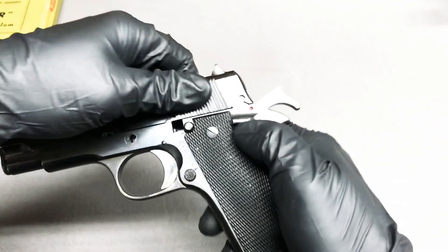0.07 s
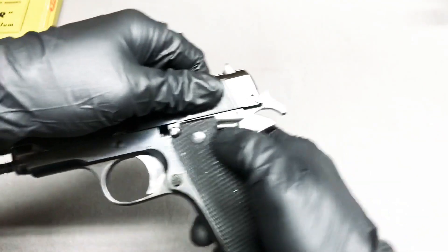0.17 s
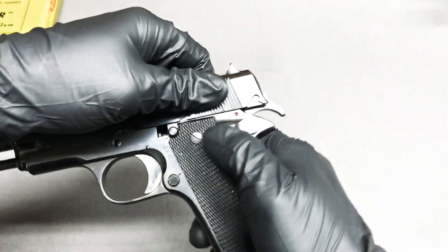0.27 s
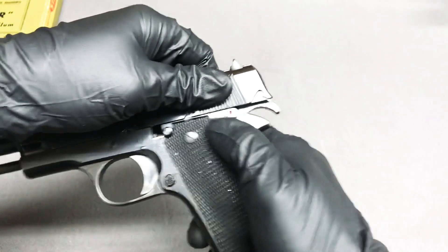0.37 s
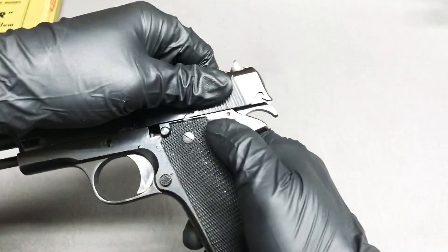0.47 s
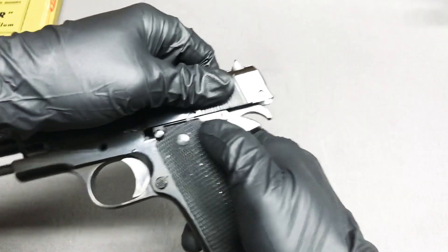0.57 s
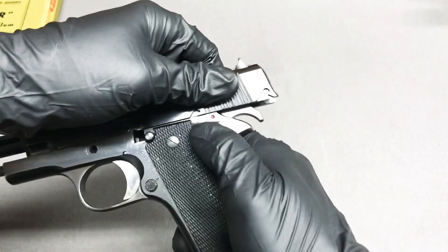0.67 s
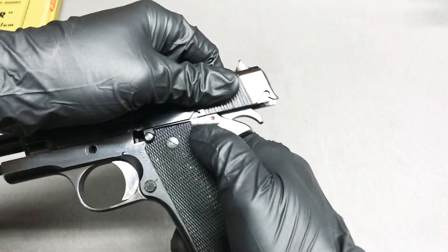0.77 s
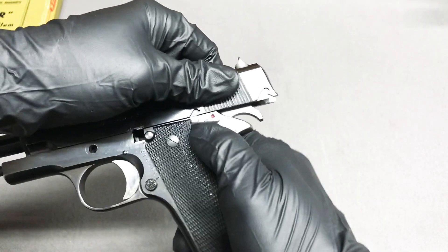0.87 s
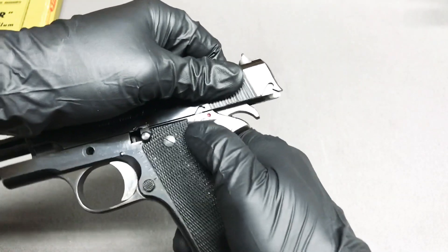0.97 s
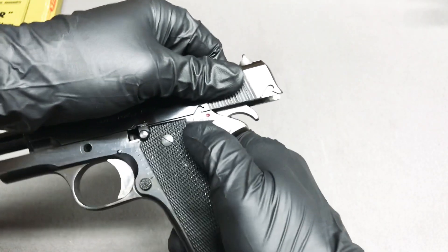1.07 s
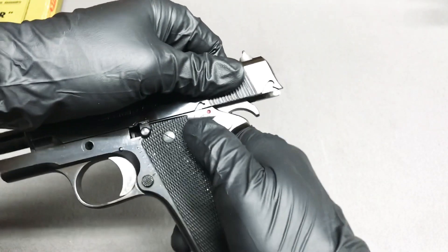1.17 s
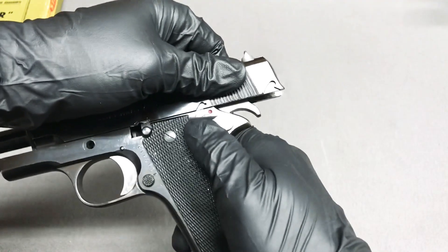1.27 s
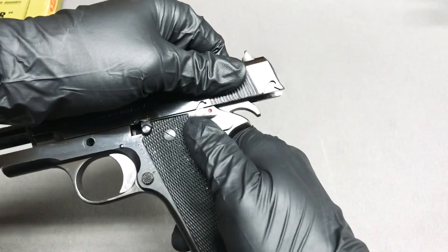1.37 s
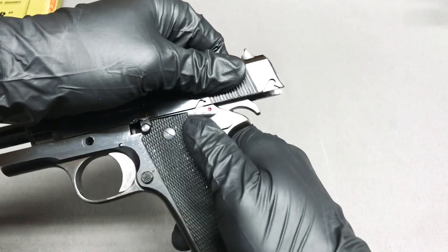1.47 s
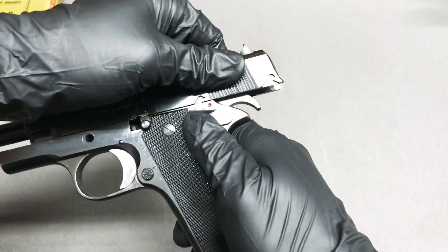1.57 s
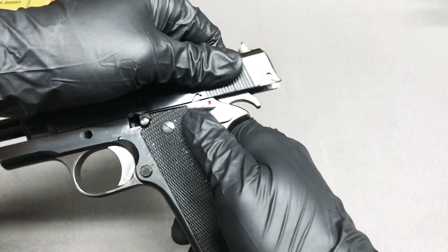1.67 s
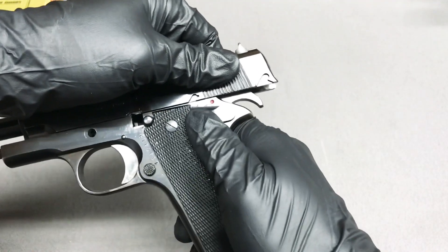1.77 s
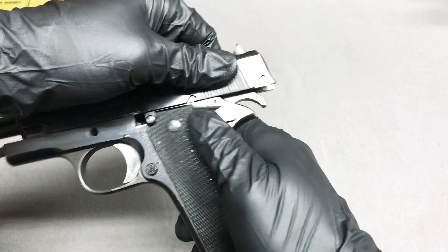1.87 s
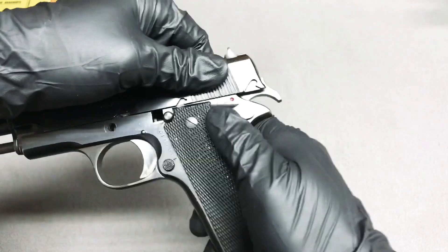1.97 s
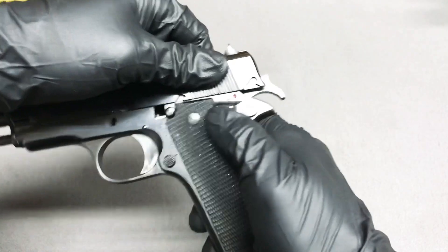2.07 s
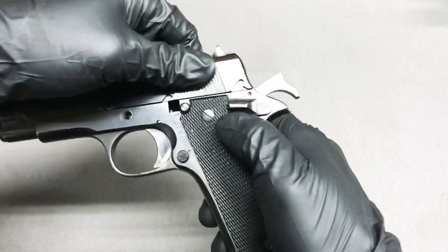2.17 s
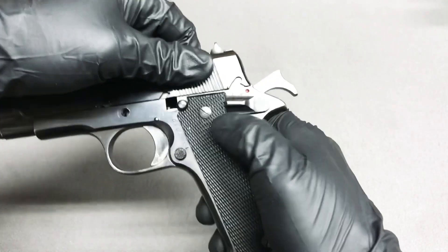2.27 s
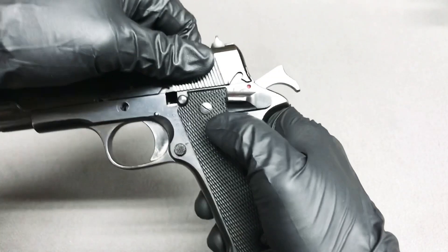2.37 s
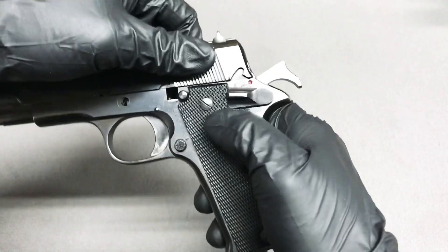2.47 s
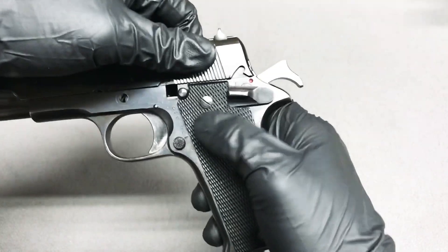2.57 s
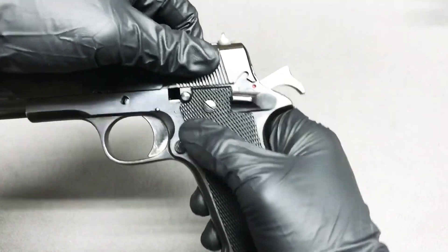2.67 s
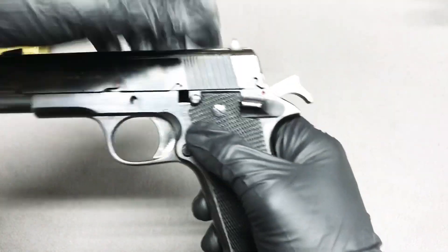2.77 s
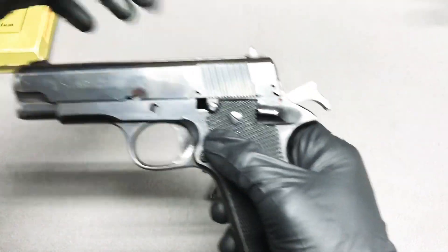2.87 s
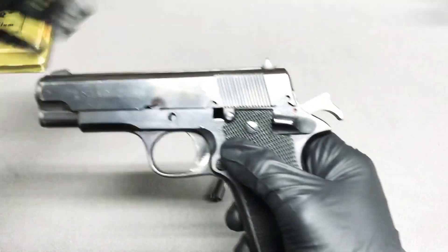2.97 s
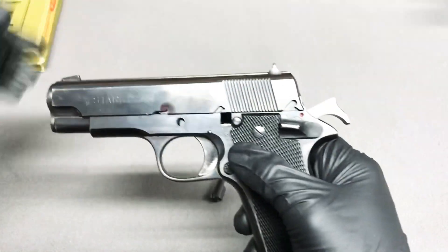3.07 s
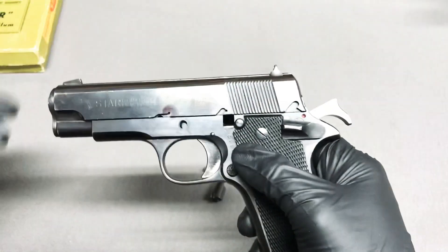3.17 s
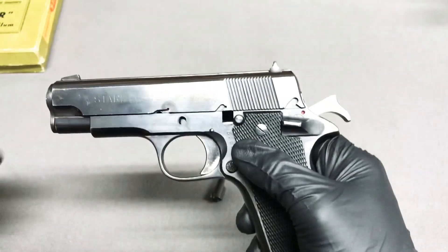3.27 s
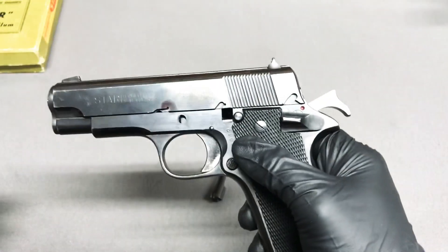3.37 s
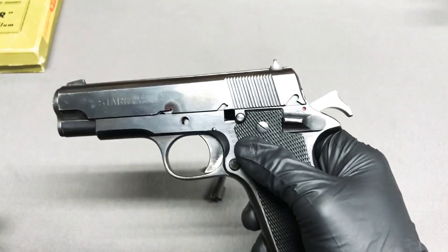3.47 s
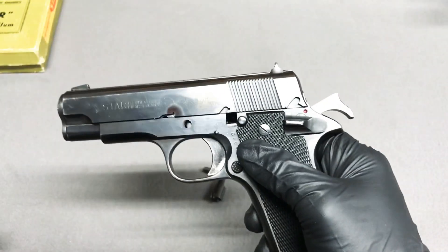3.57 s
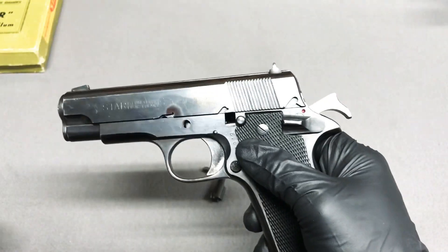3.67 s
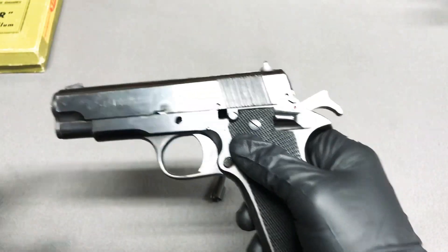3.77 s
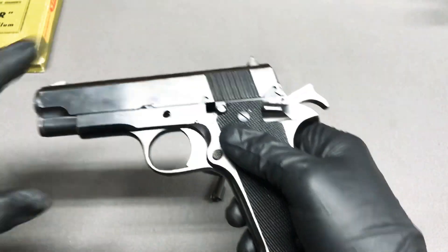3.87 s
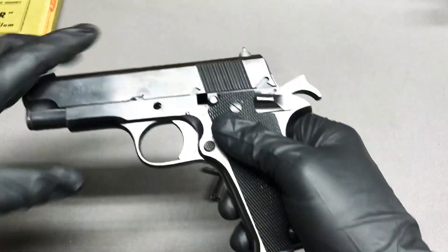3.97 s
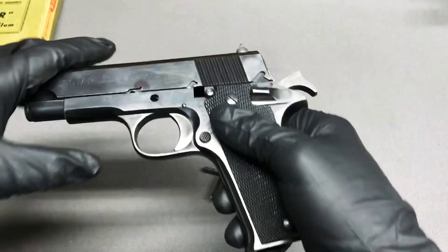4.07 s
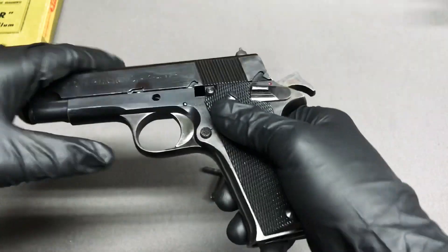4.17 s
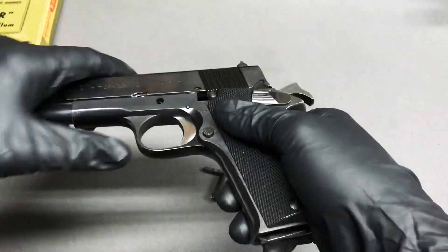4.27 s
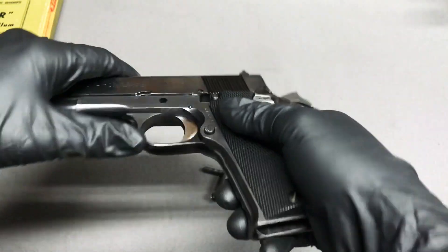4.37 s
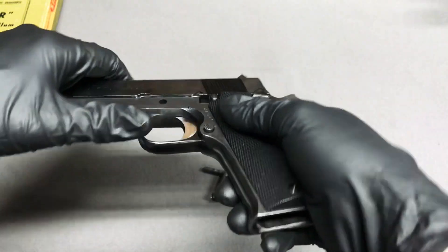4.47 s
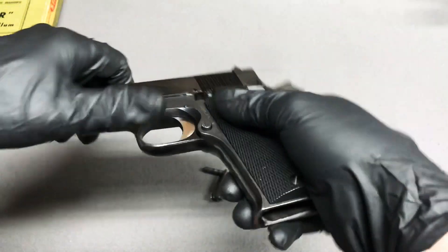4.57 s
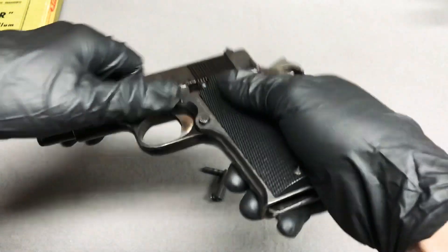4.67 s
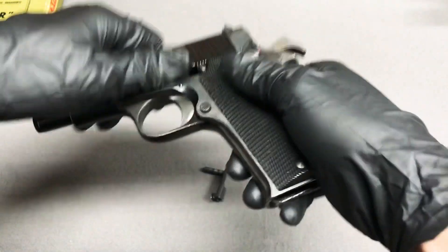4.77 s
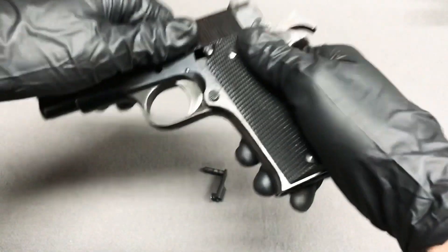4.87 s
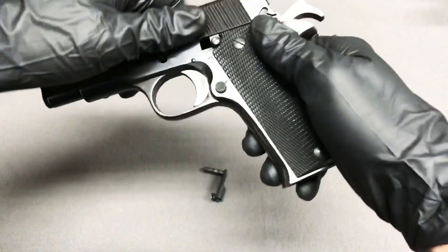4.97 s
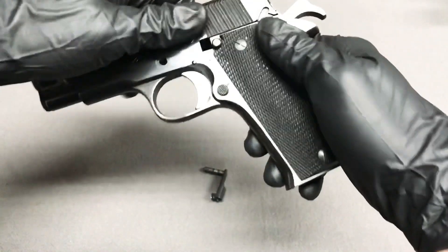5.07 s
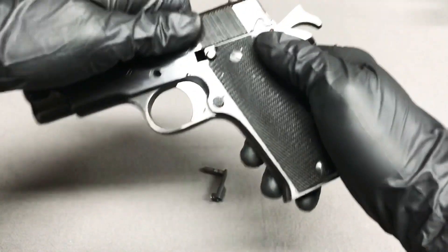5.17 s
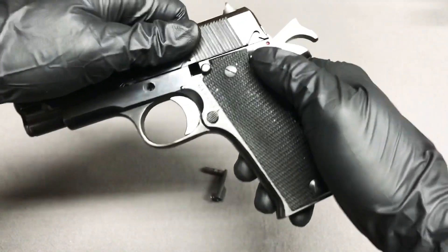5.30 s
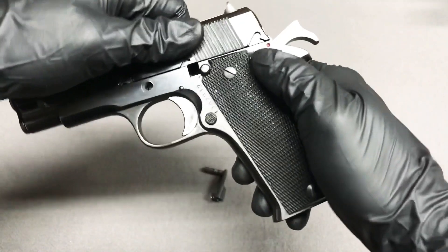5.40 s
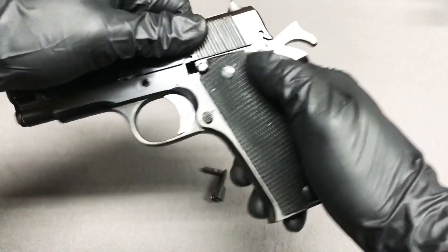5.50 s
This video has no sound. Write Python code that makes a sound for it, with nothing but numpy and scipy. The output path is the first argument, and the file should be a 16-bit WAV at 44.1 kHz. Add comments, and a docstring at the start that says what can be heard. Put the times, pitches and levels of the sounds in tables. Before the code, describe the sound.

Sharp steel clicks and a brief high ping as a pistol's slide is worked by gloved hands, close up in a quiet room.

```python
"""One hears clusters of sharp steel clicks, close by in a quiet room, as gloved hands work a pistol's slide.
Slide, frame and hammer catch on each other: short noise forces excite damped modes, and a small part pings near 7 kHz.
Between the clicks the slide rubs on its rails and the gloves rustle, made of coloured friction noise and snaps.
Underneath lie a low rumble, a steady hum and a faint hiss that rises after each loud click."""
import sys
import numpy as np
from scipy import signal
from scipy.fft import rfft, irfft
from scipy.io import wavfile
from scipy.ndimage import uniform_filter1d

SR = 44100
rng = np.random.default_rng(int(sys.argv[2]) if len(sys.argv) > 2 else 0)


def unload_wav(signal):
    """Save mono or channel-first audio to the path in sys.argv[1] as 16-bit WAV at rate SR, clipped to [-1, 1]."""
    wavfile.write(
        sys.argv[1],
        SR,
        np.round(np.clip(np.atleast_2d(signal).T, -1, 1) * 32767).astype(np.int16),
    )


N = 244065
TIME = np.arange(N) / SR


def from_db(db):
    """Logarithmic level: decibels to amplitude gain."""
    return 10 ** (np.asarray(db) / 20)


def rms_one(x):
    """Power normalisation: scale to rms 1."""
    return x / np.sqrt(np.mean(x ** 2) + 1e-20)


def attack_one(x):
    """Power normalisation of an onset: scale to rms 1 over the first 4 ms."""
    return rms_one_gain(x[:int(.004 * SR)]) * x


def rms_one_gain(x):
    """Power normalisation: the gain that brings x to rms 1."""
    return 1 / np.sqrt(np.mean(x ** 2) + 1e-20)


def band(x, low_hz, high_hz, order=2):
    """Band limitation: a causal Butterworth band-pass."""
    edges = [low_hz, min(high_hz, .45 * SR)]
    return signal.sosfilt(signal.butter(order, edges, "band", fs=SR, output="sos"), x)


def resonate(x, hz, width):
    """Damped resonance: a two-pole filter of the given width in Hz, with a gain near 1 at its peak."""
    r = np.exp(-np.pi * width / SR)
    numerator = np.array([1, 0, -1]) * (1 - r * r) / 2
    return signal.lfilter(numerator, [1, -2 * r * np.cos(2 * np.pi * hz / SR), r * r], x)


def fade(t, t60):
    """Exponential decay: the amplitude falls by 60 dB in t60 seconds."""
    return np.exp(-np.log(1000) * t / t60)


def swell(middle, length):
    """Gaussian envelope: a smooth rise and fall, at 1/e of its peak half a length from the middle."""
    return np.exp(-(2 * (TIME - middle) / length) ** 2)


def colour(x, points):
    """Spectral shaping: impose levels drawn between (Hz, dB) points, with skirts outside; rms 1."""
    hz, db = np.transpose(points)
    f = np.maximum(np.fft.rfftfreq(N, 1 / SR), 1)
    skirts = np.minimum(1, f / hz[0]) ** 4 * np.minimum(1, hz[-1] / f) ** 2
    gain = skirts * from_db(np.interp(np.log(f), np.log(hz), db))
    return rms_one(irfft(rfft(x) * gain, N))


def add(out, s, sound):
    """Superposition: mix a sound in at time s."""
    i = int(s * SR)
    out[i:i + len(sound)] += sound[:N - i]


def suppressor(sound):
    """Level-controlled gain: a noise suppressor lets the hiss up around each loud click, then shuts."""
    open_above_db, open_db = -26, 10
    hold_s, glide_s = 0.413, .03
    loud = uniform_filter1d(sound ** 2, size=176) > from_db(open_above_db) ** 2
    last_loud = np.maximum.accumulate(np.where(loud, TIME, -np.inf))
    is_open = 1.0 * (TIME - last_loud < hold_s)
    return from_db(open_db * uniform_filter1d(is_open, int(glide_s * SR)))


# Steady hum tones. Each row: frequency in Hz, rms level in dB.
HUM_TONES = [(40.2, -62), (59, -59), (104.7, -65), (240, -69.5)]
# Spectrum of the room rumble. Each row: frequency in Hz, relative level in dB.
RUMBLE_SPECTRUM = [(30, -15.5), (38, -2), (48, -2.5), (76, -3.5), (110, -14.5), (151, -12), (245, -18.5),
                   (411, -23), (600, -32), (900, -33)]
# Spectrum of the faint hiss. Each row: frequency in Hz, relative level in dB.
HISS_SPECTRUM = [(600, 1.5), (1200, 4.5), (2600, 2.5), (4500, -0.5), (7000, -3.5), (10500, -6.5),
                 (12500, -6), (16000, -9.5)]


def background(hiss_gain, rumble_db=-55, shut_hiss_db=-72):
    """Stationary sound: low room rumble and hiss as shaped noise, and an appliance's hum as pure tones."""
    hum = np.zeros(N)
    for hz, db in HUM_TONES:
        hum += from_db(db) * np.sqrt(2) * np.sin(2 * np.pi * (hz * TIME + rng.random()))
    rumble = from_db(rumble_db) * colour(rng.standard_normal(N), RUMBLE_SPECTRUM)
    hiss = from_db(shut_hiss_db) * hiss_gain * colour(rng.standard_normal(N), HISS_SPECTRUM)
    return hum + rumble + hiss


# Registers of a contact: knock, clack and edge. Each row: low edge in Hz, high edge in Hz.
CONTACT_REGISTERS = [(1100, 2300), (2500, 6700), (7100, 15300)]
# Modes of slide and frame, damped by the hands. Each row: frequency in Hz, width in Hz, mean strength in dB.
BODY_MODES = [(1310, 250, -5), (1579, 230, -2), (1820, 180, 1.5), (2290, 30, -4), (2610, 110, -1.5),
              (3230, 340, -8.5), (3680, 96, -3), (3880, 220, 0.5), (4290, 330, 0), (5310, 260, -1.5),
              (5820, 190, -3), (6180, 200, -5), (7310, 350, 2), (8074, 260, 1), (9200, 3600, -5),
              (11280, 500, 1), (13650, 500, -5), (14400, 480, -9)]


def click(levels_db, t60, crack_db=-3, thud_db=-21, impact_db=3.0, impact_t60=.006, chatter_db=-25, chatter_t60=0.2):
    """Modal excitation: a hard impact and briefly chattering faces shake the modes of slide and frame."""
    t = np.arange(SR // 10) / SR
    impact = from_db(impact_db) * fade(t, impact_t60)
    chatter = from_db(chatter_db) * fade(t, chatter_t60)
    pressure = impact + fade(t, t60) + chatter
    onset = 1 - np.exp(-t / .0002)
    force = rng.standard_normal(len(t)) * pressure * onset
    steel = from_db(crack_db) * force
    for hz, width, db in BODY_MODES:
        strength = from_db(db + rng.normal(0, 2))
        steel = steel + strength * resonate(force, hz, width)
    # the whole gun recoils a little in the hand
    out = from_db(levels_db[0] + thud_db) * attack_one(band(force, 260, 1200))
    for db, (low, high) in zip(levels_db, CONTACT_REGISTERS):
        out = out + from_db(db) * attack_one(band(steel, low, high, order=3))
    return out


# Knocks of loose parts as the gun shifts in the grip. Each row: start in seconds, level in dB before colour.
LOOSE_KNOCKS = [(0.0874, -56.5), (0.1062, -59), (0.168, -42), (0.174, -48.5), (0.1876, -46.5),
                (0.6367, -44), (1.098, -48), (2.4205, -51.5), (2.556, -52.5), (2.569, -56), (2.75, -52.5),
                (2.828, -56), (3.971, -62.5), (4.4556, -63), (4.824, -62.5), (4.8915, -64), (5.018, -61.5),
                (5.341, -58), (5.4532, -58.5)]
# Colour of a knock: offsets in dB for the knock, clack and edge registers.
KNOCK_OFFSETS_DB = (-2, -2.5, -24)


def loose_knocks(t60=0.023):
    """Dull impact: loose parts knock with little energy in the highest register."""
    out = np.zeros(N)
    for s, db in LOOSE_KNOCKS:
        add(out, s, click(db + np.array(KNOCK_OFFSETS_DB), t60))
    return out


# Modes of the small ringing part. Each row: frequency in Hz, relative level in dB, t60 in seconds if free.
PING_MODES = [(6935, 4.5, 0.044), (7070, -6.5, 0.049), (6932, -29, 0.55), (7040, -40.5, .35)]


def ping(longest_t60, detune=.001):
    """Free modal decay: a small part rings as long as the grip lets it, its pitch shifting from blow to blow."""
    t = np.arange(int(longest_t60 * SR)) / SR
    out = np.zeros(len(t))
    for hz, db, t60 in PING_MODES:
        strength = from_db(db + rng.normal(0, 1))
        shifted_hz = hz * (1 + detune * rng.normal())
        out += strength * fade(t, min(t60, longest_t60)) * np.sin(2 * np.pi * shifted_hz * t)
    return attack_one(out)


# The slide catches or hits a stop, steel on steel.
# Each row: start in seconds, knock, clack and edge levels in dB, ping level in dB before a common trim.
SLIDE_CATCHES = [(0.2202, -41, -35.5, -35.5, -42), (0.229, -22.5, -12.5, -13.5, -27.5),
                 (0.233, -24, -27, -29, -34), (0.262, -49, -41.5, -32, -47.5),
                 (0.2957, -51, -38, -53.5, -54.5), (0.4432, -33, -42.5, -23.5, -41.5),
                 (0.4476, -38.5, -23, -26.5, -18.5), (0.4711, -47, -28.5, -31, -32.5),
                 (0.493, -41, -34.5, -50.5, -34.5), (0.6712, -35, -21.5, -19, -17.5),
                 (0.6877, -39, -30, -27, -47.5), (0.7064, -41.5, -32.5, -24, -44.5),
                 (0.7243, -45, -37.5, -31.5, -44), (1.017, -52, -43.5, -35.5, -65),
                 (1.041, -35, -24.5, -24.5, -24.5), (1.0505, -41, -53, -42, -59),
                 (1.0803, -39, -31, -34.5, -39), (1.5943, -59.5, -54.5, -61, -59),
                 (1.8177, -53.5, -52, -45, -68), (1.842, -56.5, -59.5, -44, -63),
                 (1.944, -53, -50, -42.5, -58), (1.953, -52, -42, -62, -67), (1.982, -49, -43, -32.5, -50),
                 (1.9954, -46, -44, -32, -49), (2.012, -44, -37, -24, -38),
                 (2.0246, -42, -44, -29.5, -34.5), (2.0292, -33.5, -30, -39, -42),
                 (2.038, -36, -33.5, -41, -50.5), (2.045, -42.5, -31, -27.5, -34.5),
                 (2.154, -40.5, -44, -39.5, -60), (2.1585, -51, -36, -49, -60),
                 (2.1779, -46, -42.5, -32.5, -37.5), (2.2555, -29, -21, -19.5, -18.5),
                 (4.1257, -82.5, -65, -64.5, -73)]


def catches(ping_db, t60=0.031, free_t60=.6, held_t60=.035):
    """Impact and ringing: every catch or stop of the slide clicks and strikes the small part."""
    out = np.zeros(N)
    for s, knock, clack, edge, ring in SLIDE_CATCHES:
        add(out, s, click((knock, clack, edge), t60))
        # while the slide is drawn back the small part rings freely, otherwise it is held
        longest_t60 = free_t60 if .4 < s < 1.2 else held_t60
        add(out, s, from_db(ping_db + ring) * ping(longest_t60))
    return out


def action(ping_db=-1.0):
    """Superposition of impacts: the slide's catches and the knocks of loose parts."""
    return loose_knocks() + catches(ping_db)


# The room's answer. Each row: frequency in Hz, level in dB, t60 in seconds.
ROOM_RESPONSE = [(400, -15, 0.42), (1400, -12.5, 0.21), (3520, -13.5, .33), (6950, -21, 0.46),
                 (11000, -19, 0.38), (15000, -21.5, 0.2)]


def room(x, build_s=0.002):
    """Diffuse reverberation: reflections build up quickly and decay at a rate set for each band."""
    t = np.arange(SR * 2 // 3) / SR
    hz, db, t60 = np.transpose(ROOM_RESPONSE)
    edges = np.geomspace(200, 17000, 11)
    response = 0
    for low, high in zip(edges, edges[1:]):
        centre = np.sqrt(low * high)
        shape = fade(t, np.interp(centre, hz, t60)) * (1 - np.exp(-t / build_s)) ** 2
        noise = rng.standard_normal(len(t)) * shape / np.linalg.norm(shape)
        response = response + from_db(np.interp(centre, hz, db)) * band(noise, low, high)
    return signal.fftconvolve(x, response)[:N]


# The slide travels along its rails.
# Each row: start in seconds, end in seconds, level at the end in dB before colour, brightness in dB.
RAIL_TRAVELS = [(0.2, 0.222, -40, -1), (1.779, 1.803, -51.5, 4.5), (1.969, 2.023, -38.5, 2),
                (2.2113, 2.254, -40.5, -1.5)]
# Colour of a rail tick: offsets in dB for the knock, clack and edge registers.
RAIL_OFFSETS_DB = (-3.5, 0, 0)


def rail_ticks(ticks_per_s=85, t60=.034, rise_db=7, scatter_db=3.0, jitter=0.21):
    """Stick-slip: the travelling slide trips over its rails at an uneven pace, harder towards the end."""
    out = np.zeros(N)
    for start, end, db, bright_db in RAIL_TRAVELS:
        registers_db = np.array(RAIL_OFFSETS_DB) + bright_db * np.array([-1, 0, 1])
        s = start
        while s < end:
            level_db = db - rise_db * (end - s) / (end - start)
            scatter = scatter_db * rng.standard_normal(size=3)
            add(out, s, click(level_db + registers_db + scatter, t60))
            s += np.exp(jitter * rng.standard_normal()) / ticks_per_s
    return out


def friction(grains_per_s, grain_db, spread_db):
    """Sliding friction: smooth noise with tiny random slips of uneven size."""
    happens = rng.random(N) < grains_per_s / SR
    size = from_db(spread_db * np.minimum(rng.exponential(1, N), 4))
    slips = happens * rng.choice([-1, 1], N) * size
    return rng.standard_normal(N) + from_db(grain_db) * rms_one(slips)


# The gloves shift their hold on the gun.
# Each row: middle in seconds, length in seconds, dull rub in dB and hiss in dB, both before a common trim.
GLOVE_STROKES = [(0.435, 0.03, -54, -62), (0.654, 0.042, -55, -54.5), (0.965, 0.094, -66, -84),
                 (1.36, 0.11, -65.5, -70.5), (1.68, 0.076, -61.5, -89), (1.795, 0.1, -59.5, -61.5),
                 (2.589, 0.066, -57.5, -66.5), (2.682, 0.14, -65, -74), (2.795, 0.086, -80, -68.5),
                 (2.897, 0.14, -68.5, -67.5), (3.87, 0.21, -83.5, -74), (4.319, 0.22, -78.5, -71.5),
                 (4.664, 0.19, -72.5, -72.5), (4.813, 0.064, -68.5, -64.5), (4.888, 0.071, -65, -62.5),
                 (5.139, 0.36, -75, -68)]
# Spectrum of the dull rub. Each row: frequency in Hz, relative level in dB.
RUB_SPECTRUM = [(400, -2), (800, -1.5), (1500, 1), (2600, 0), (4000, -5), (6000, -10.5), (12000, -45.5)]
# Spectrum of the bright rustle. Each row: frequency in Hz, relative level in dB.
RUSTLE_SPECTRUM = [(3000, 5.5), (4500, 3.5), (8000, 1), (10500, -1.5), (12500, -1.5), (16000, -5.5)]


def rubbing(rub_db=1.5, rustle_db=-0.5, rail_hiss_db=-15):
    """Friction noise: each shift of the slide or of a glove swells and fades, grainy with small slips."""
    rub, rustle = np.zeros((2, N))
    for middle, length, dull_db, bright_db in GLOVE_STROKES:
        rub += from_db(rub_db + dull_db) * swell(middle, length)
        rustle += from_db(rustle_db + bright_db) * swell(middle, length)
    for start, end, db, _ in RAIL_TRAVELS:
        rustle += from_db(rail_hiss_db + db) * swell((start + end) / 2, end - start)
    dull = colour(friction(grains_per_s=160, grain_db=1, spread_db=3.5), RUB_SPECTRUM)
    bright = colour(friction(grains_per_s=200, grain_db=-1.0, spread_db=2.5), RUSTLE_SPECTRUM)
    return rub * dull + rustle * bright


# Colour of a crease: offsets in dB for the knock, clack and edge registers.
CREASE_OFFSETS_DB = (-6.5, -1.5, -6)


def creases(snaps_per_s=34, snap_db=-3, t60=.012, scatter_db=3.0):
    """Snap-through: folds of the gloves snap at random times during the strokes."""
    out = np.zeros(N)
    for middle, length, _, hiss_db in GLOVE_STROKES:
        # snap_db is relative to the hiss column
        registers_db = hiss_db + snap_db + np.array(CREASE_OFFSETS_DB)
        for s in middle + length * rng.uniform(-0.41, 0.39, round(snaps_per_s * length)):
            add(out, s, click(registers_db + scatter_db * rng.standard_normal(size=3), t60))
    return out


def scene(count=2):
    """Direct and reflected sound: each side of the room gets its own mix of modes, and less of the ping."""
    steel = action()
    reflections = sum(room(action(ping_db=-8.5)) for side in range(count)) / np.sqrt(count)
    close = steel + rubbing() + background(suppressor(steel))
    ticks = rail_ticks()
    return (close + reflections + ticks + room(ticks) + creases())[None]


def record(dry, top=1.4, cutoff_hz=15850):
    """Saturation and band limitation: the loudest peaks are rounded and the highest treble is cut."""
    lowpass = signal.ellip(10, .2, 70, cutoff_hz, fs=SR, output="sos")
    return signal.sosfilt(lowpass, top * np.tanh(dry / top))


dry = scene()
out = record(dry)
unload_wav(out)
```